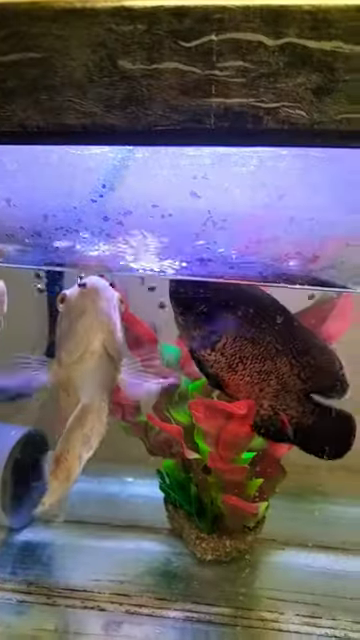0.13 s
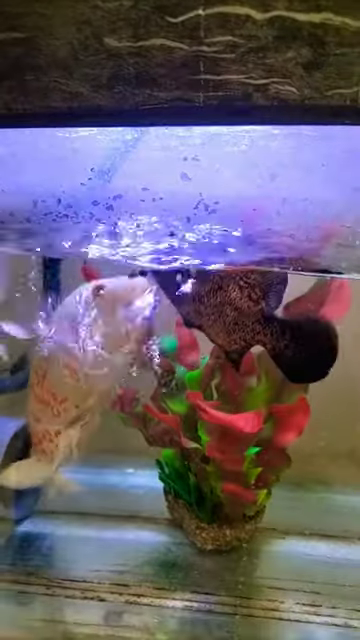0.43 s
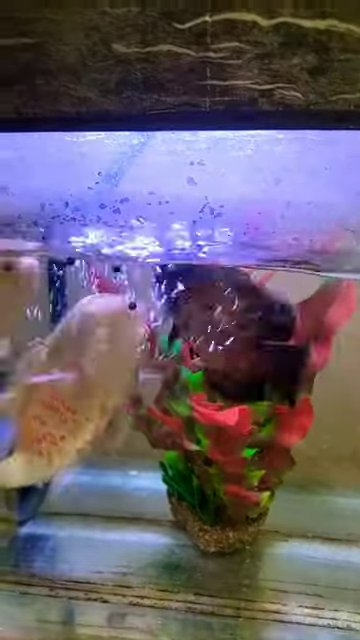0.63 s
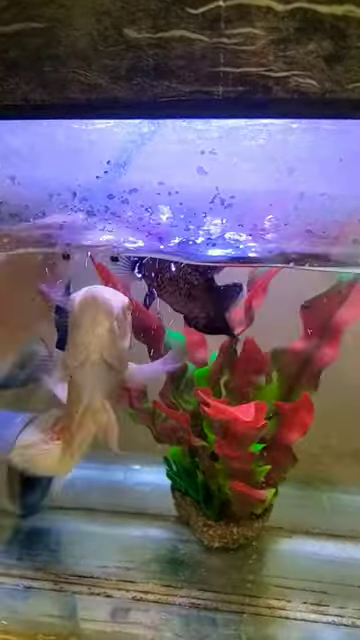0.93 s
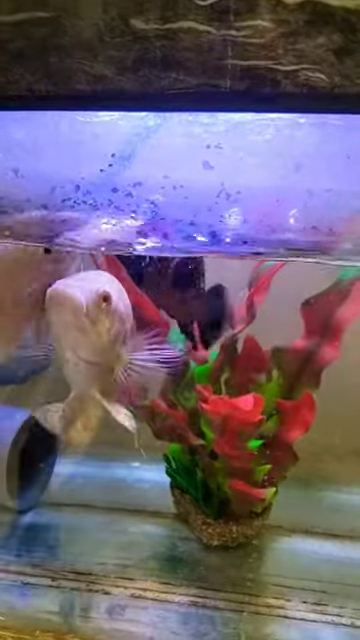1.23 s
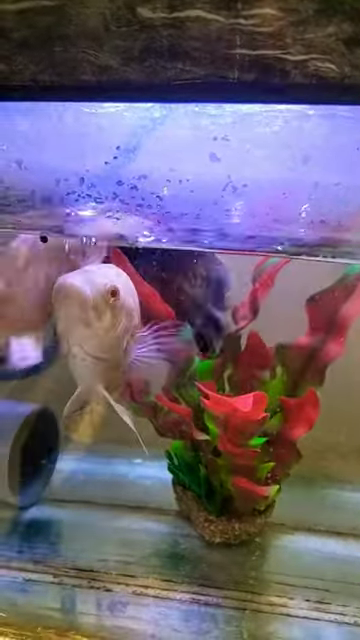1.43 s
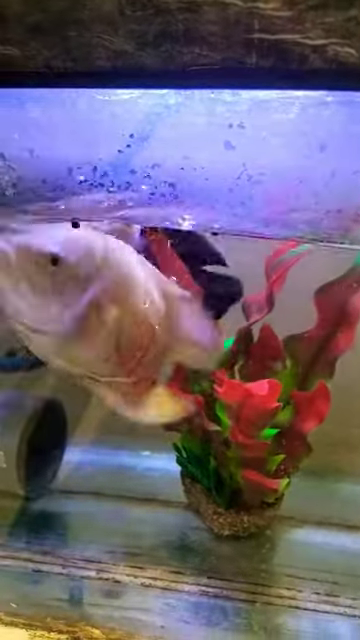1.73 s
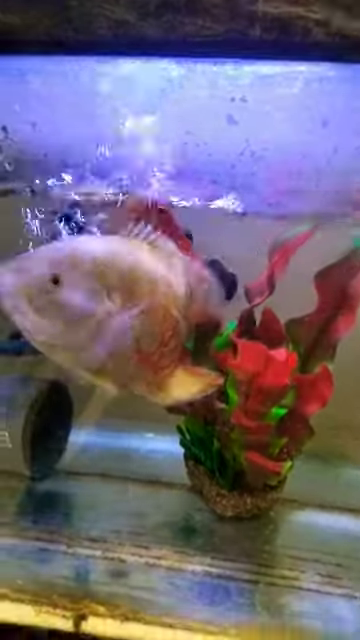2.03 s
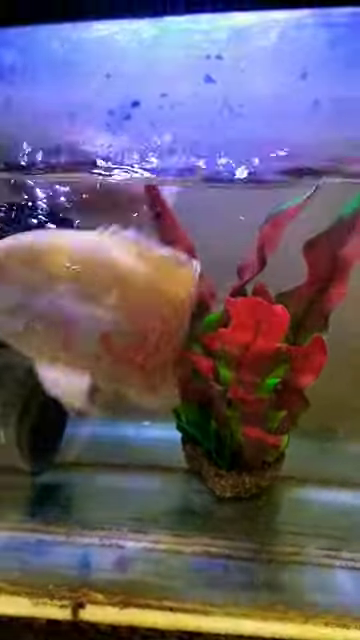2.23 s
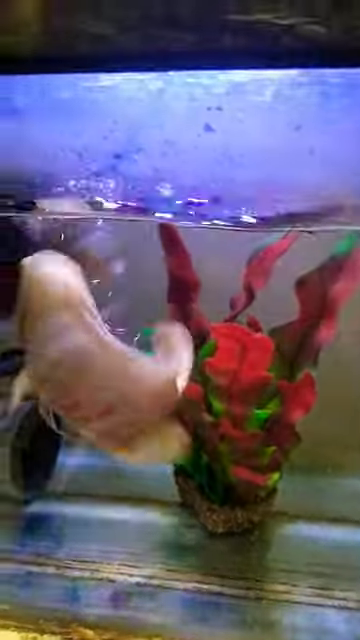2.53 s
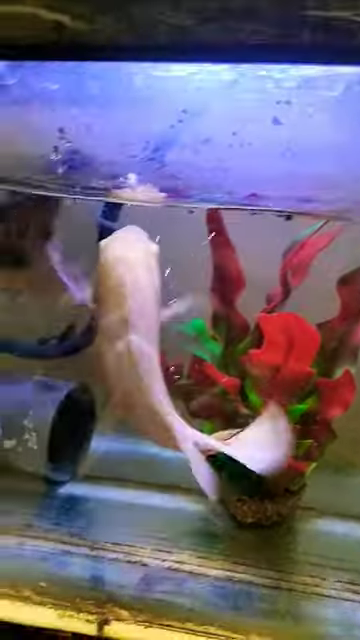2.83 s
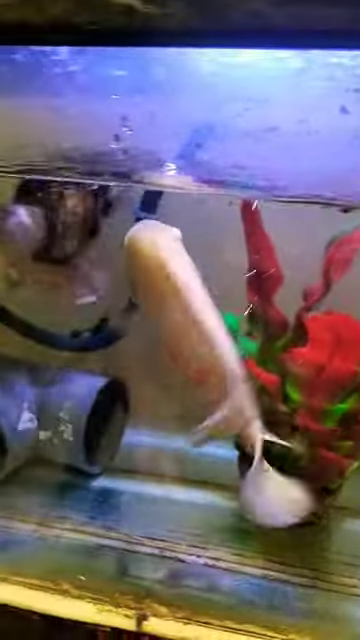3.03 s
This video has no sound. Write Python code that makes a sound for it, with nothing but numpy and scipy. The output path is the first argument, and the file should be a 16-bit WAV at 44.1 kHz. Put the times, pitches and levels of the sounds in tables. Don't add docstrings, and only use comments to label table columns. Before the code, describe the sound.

Fish splash at the surface of an indoor tank. A loud splash is already under way at 0 s, with crackling spray and dense droplets until 0.4, then smaller plops to 0.65. Faint fizz comes near 1.1, a thin spray tick at 1.8, plips and light splashes at 2.0-2.4, and chirpy ringing bubbles with fizz at 2.6-2.95. Filter rush and faint pump hum continue throughout, slightly dull mono.

```python
import sys
import numpy as np
from scipy import signal
from scipy.fft import rfft, irfft
from scipy.io import wavfile
from scipy.ndimage import uniform_filter1d

SR = 44100
rng = np.random.default_rng(int(sys.argv[2]) if len(sys.argv) > 2 else 0)


def invert_db(x):
    u = np.asarray(x, float) / 20
    return 10 ** u


def int16_out(signal):
    q = np.round(np.clip(np.atleast_2d(signal).T, -1, 1) * 32767)
    wavfile.write(sys.argv[1], SR, q.astype(np.int16))


N = 141120


def evened(x):
    return x / np.sqrt(np.mean(abs(x) ** 2) + 1e-30)


def smooth_twice(x, size):
    return uniform_filter1d(uniform_filter1d(x, size), size)


def read(points, hz):
    f, level_db = np.transpose(points)
    return np.interp(np.log(hz + 1), np.log(f + 1), level_db, level_db[0] - 40, level_db[-1] - 40)


def colour(x, points):
    gain = invert_db(read(points, np.fft.rfftfreq(len(x), 1 / SR)))
    return irfft(rfft(x) * gain, len(x))


def resonate(x, hz, width_hz):
    turn = np.exp(2j * np.pi * hz * np.arange(len(x)) / SR)
    pole = np.exp(-np.pi * width_hz / SR)
    low = signal.lfilter([1], np.convolve([1, -pole], [1, -pole]), x / turn)
    return (turn * low).real


def held(length_s, rise_s, fall_s):
    t = np.arange(round((length_s + 8 * fall_s) * SR)) / SR
    return t, np.clip(t / rise_s, 0, 1) * np.exp(-np.maximum(t - length_s, 0) / fall_s)


def add(mix, start_s, sound):
    part = mix[round(start_s * SR):][:len(sound)]
    part += sound[:len(part)]


# hz, level_db
RUSH_LOW = [(28, -45.5), (50, -23), (120, -21.5), (240, -7), (470, -9.5), (1300, -8.5), (1750, -15.5),
            (2600, -32)]
# hz, level_db
RUSH_HIGH = [(900, -25), (1700, -11.5), (2500, -3.5), (3400, -11), (5510, -18), (7100, -35.5), (8810, -57),
             (15510, -62)]
# pitch_hz, width_hz, level_db
HUM = [
    (62.7, 8.9, -78),
    (187, 2.4, -66.5),
    (272.8, 49.4, -58),
    (337.4, 25, -61.5),
    (651.7, 41, -64.5),
    (3920, 740, -66.5),
    (11900, 540, -106),
]
RUSH_LOW_DB, RUSH_HIGH_DB, PATCH_DB = -51, -59.5, 1.28


def pump():
    a, b = rng.standard_normal((2, N))
    rush = invert_db(RUSH_LOW_DB) * evened(colour(a, RUSH_LOW))
    rush += invert_db(RUSH_HIGH_DB) * evened(colour(b, RUSH_HIGH))
    z = signal.stft(rush, nperseg=512)[2]
    patches = uniform_filter1d(rng.standard_normal(z.shape), 8, 0)
    patches = evened(uniform_filter1d(patches, 14, 1))
    out = signal.istft(z * invert_db(PATCH_DB * patches), nperseg=512)[1][:N]
    for hz, width_hz, db in HUM:
        out = out + invert_db(db) * evened(resonate(rng.standard_normal(N), hz, width_hz))
    return out


ROOM_DB, ROOM_T60_S = -12, .22


def room(x):
    t = np.arange(SR // 2) / SR
    tail = rng.standard_normal(len(t)) * invert_db(-60 * t / ROOM_T60_S) * (t > .004)
    return invert_db(ROOM_DB) * signal.fftconvolve(x, tail / np.linalg.norm(tail))[:N]


DROPLETS_PER_S, DROPLET_SPREAD_DB, HISS = 4000, 2, .8


def crackle():
    size = invert_db(DROPLET_SPREAD_DB * np.minimum(rng.exponential(1, N), 4))
    clicks = size * (rng.random(N) < DROPLETS_PER_S / SR)
    return evened(clicks * rng.choice([-1., 1.], N)) + HISS * rng.standard_normal(N)


# start_s, length_s, level_db, pitch_hz, spread_hz
FOAM = [(0.286, 0.024, -45.5, 5100, 2900), (.296, .015, -62, 7540, 710), (.41, .1, -54, 187, 10.4),
        (0.511, 0.046, -67, 6800, 1200), (.535, 0.04, -47, 4880, 1100), (0.582, .05, -56, 4800, 1000),
        (.305, .09, -51, 4140, 450), (.495, .07, -94, 12000, 700), (2.819, .03, -63, 5940, 270),
        (2.826, .06, -62, 3810, 300), (2.07, .02, -86, 11700, 600), (2.18, .035, -88, 11700, 600),
        (2.23, .018, -57, 4020, 500), (2.94, .1, -67, 3110, 400), (0.673, 0.079, -88.5, 8300, 430),
        (.751, .039, -85, 7870, 610), (1.091, 0.11, -51.5, 3510, 1700), (1.234, 0.054, -73.5, 6950, 1000),
        (1.238, 0.04, -89, 10200, 380), (1.256, 0.04, -57, 3480, 570), (2.024, .025, -74, 7640, 1700),
        (2.036, 0.012, -55, 3740, 800), (.53, 0.039, -90, 8840, 560), (2.202, 0.019, -69, 7100, 1400),
        (2.55, .15, -57, 187, 15), (2.601, .059, -84, 11910, 610), (2.605, 0.044, -52, 5820, 1270),
        (2.648, .07, -59, 5950, 1000), (2.699, .48, -94, 11400, 3200), (2.706, 0.04, -65, 6650, 800),
        (2.658, 0.55, -73, 6140, 2200)]
FOAM_FALL_S, FOAM_SAG_DB = .008, -4


def foam(start_s, length_s, db, hz, spread_hz, fizz):
    t, shape = held(length_s, .3 * length_s, FOAM_FALL_S)
    band = np.roll(fizz, -rng.integers(N))[:SR]
    band = resonate(resonate(band, hz, spread_hz), hz, spread_hz)
    return start_s, invert_db(db + FOAM_SAG_DB * t / length_s) * shape * evened(band[-len(t):])


# start_s, length_s, level_db, pitch_hz, rise_hz
BUBBLES = [(.34, .015, -57, 5750, 20), (2.63, .045, -52, 3500, 100), (2.68, .07, -55, 3620, 110),
           (2.672, .045, -51, 3780, 250), (2.71, .025, -61, 4450, 250), (2.72, .052, -46.5, 2200, 200),
           (2.765, .04, -51, 2400, 80), (2.74, .05, -51, 2880, 150), (2.788, .033, -44, 3080, 30),
           (2.825, .025, -55, 3070, 10), (2.862, .068, -50, 3120, 30), (2.675, .04, -58, 1800, 250),
           (2.876, .04, -63, 2280, 70), (2.725, .03, -62, 4220, 80), (2.81, .04, -62, 2300, -150)]
BUBBLE_FALL_S, WAVER, WAVER_S = .006, .55, .003


def bubble(start_s, length_s, db, hz, rise_hz):
    t, shape = held(length_s, .4 * length_s, BUBBLE_FALL_S)
    pitch_hz = hz + rise_hz * np.clip(t / length_s, 0, 1.3)
    size = round(WAVER_S * SR)
    wobble = smooth_twice(rng.standard_normal((2, 8000)), size) * np.sqrt(size)
    wobble = (wobble[0] + 1j * wobble[1])[:len(t)]
    throb = np.sqrt(1 + WAVER ** 2) * evened(1 + WAVER * wobble)
    tone = throb * np.exp(2j * np.pi * np.cumsum(pitch_hz) / SR)
    return start_s, invert_db(db) * shape * tone.real


# peak_s, level_db, pitch_hz, width_s
DROPS = [(0.0012, -46, 2180, 0.0013), (0.003, -39, 3800, 0.0025), (0.0052, -36, 4480, 0.0029),
         (0.007, -39, 2210, 0.0024), (0.0137, -38, 5700, 0.0055), (0.0137, -28, 4400, 0.002),
         (0.017, -46, 2500, 0.0035), (0.018, -41, 3970, 0.0064), (0.0244, -30, 3610, 0.0025),
         (0.0247, -38.5, 2160, 0.0047), (0.0267, -40, 6070, 0.003), (0.0284, -30, 4550, 0.0022),
         (0.0304, -38, 3580, 0.0025), (0.033, -38, 2680, 0.00082), (0.0359, -42, 3700, 0.003),
         (0.0367, -39, 5400, 0.003), (0.0414, -40, 4500, 0.007), (0.044, -45, 3830, 0.0023),
         (0.0536, -41, 4480, 0.0051), (0.0686, -41, 4570, 0.0049), (0.0696, -39, 3500, 0.0064),
         (0.0733, -40, 4610, 0.0042), (0.0756, -38, 3200, 0.0027), (0.0858, -38, 4310, 0.0025),
         (0.0878, -41, 2180, 0.007), (0.091, -39, 3580, 0.0025), (0.0938, -45, 2350, 0.00715),
         (0.1018, -39, 4260, 0.00314), (0.1097, -37, 3920, 0.0046), (0.1192, -37.5, 2174, 0.0079),
         (0.1215, -36, 3520, 0.0081), (0.1259, -35, 4050, 0.0071), (0.1282, -42, 2315, 0.007),
         (0.1337, -39, 4030, 0.007), (0.137, -40, 4730, 0.0043), (0.1395, -42, 4070, 0.007),
         (0.1478, -39, 3030, 0.0072), (0.1805, -41, 4500, 0.0027), (0.1868, -39, 3980, 0.0067),
         (0.211, -46, 4570, 0.007), (0.209, -47, 3790, 0.0032), (0.2113, -41, 2100, 0.0042),
         (0.2165, -37, 3920, 0.005), (0.219, -39, 2130, 0.0042), (0.22, -41, 4560, 0.0081),
         (0.225, -40, 3550, 0.0064), (0.2268, -41, 4500, 0.0022), (0.234, -42, 4350, 0.005)]
# peak_s, level_db, pitch_hz, width_s
PLOPS = [(0.2941, -42, 4470, 0.0062), (0.2998, -43, 5190, 0.0088), (0.3026, -31.5, 3854, 0.0074),
         (0.3195, -39, 4190, 0.007), (0.3365, -41, 4110, 0.007), (0.344, -37.5, 4100, 0.007),
         (0.3594, -40, 4020, 0.007), (0.3664, -46, 4110, 0.007), (0.3727, -48, 4030, 0.007),
         (0.3836, -41, 4000, 0.0043), (0.3891, -47, 3850, 0.0025), (0.3954, -43, 4030, 0.0025),
         (0.4036, -49, 3990, 0.007), (0.4268, -57, 4070, 0.007), (0.528, -47, 4460, 0.007),
         (0.5343, -44, 4440, 0.007), (0.544, -43, 4500, 0.007), (0.5552, -36, 4950, 0.0026),
         (0.563, -39, 4650, 0.0035), (0.5685, -44, 4850, 0.0057), (0.5907, -45, 4840, 0.004),
         (0.6036, -47, 4670, 0.0025), (0.6101, -53, 4930, 0.0065), (0.6161, -57, 4660, 0.0056),
         (0.6228, -51, 4970, 0.004), (0.6288, -54, 4960, 0.007), (2.0389, -42.5, 3510, 0.0087),
         (2.0548, -52, 3270, 0.0032), (2.1177, -35, 2228, 0.0062), (2.1279, -38, 2260, 0.0032),
         (2.1359, -51, 2400, 0.0059)]
# peak_s, level_db, pitch_hz, width_s
STRAYS = [
    (2.7, -62.5, 82, .05),
    (2.58, -60, 66, 0.1),
    (2.043, -44, 3950, 0.0046),
    (2.395, -43.5, 4700, 0.0057),
    (2.617, -62, 7100, .006),
]
DROP_RISE, DROP_DB = .0013, -1


def drop(peak_s, db, hz, width_s):
    time_s = width_s / 2.4
    u = np.arange(round(3.5 * width_s * SR)) / SR / time_s
    turns = hz * u * time_s * (1 + DROP_RISE * (u - 2))
    ring = u * np.exp(1 - u) * np.sin(2 * np.pi * turns)
    return max(peak_s - time_s, 0), invert_db(db + DROP_DB) * ring


GRAINS_PER_S, GRAIN_CYCLES, GRAIN_SPREAD_DB = 90, 11, 2.1


def grains():
    out = np.zeros(N)
    for hz in np.geomspace(1800, 14000, 28):
        u = np.arange(round(4 * GRAIN_CYCLES * SR / hz)) * hz / SR
        ping = np.minimum(u / 2, 1) * np.exp(-u / GRAIN_CYCLES) * np.sin(2 * np.pi * u * (1 + 0.001 * u))
        size = invert_db(GRAIN_SPREAD_DB * np.minimum(rng.exponential(1, N), 4))
        hits = size * (rng.random(N) < GRAINS_PER_S / SR)
        out += signal.oaconvolve(hits, ping * np.sqrt(hz) / np.linalg.norm(ping))[:N]
    return evened(out)


# hz, level_db
BODY = [(700, -32), (1900, -13.5), (2200, -8), (4400, 0), (5800, -11), (7100, -23), (8600, -38.5),
        (15600, -59)]
# hz, level_db
SPRAY = [(5000, -68), (7000, -37.5), (9300, -39), (10300, -34), (12300, -32), (13000, -45), (15300, -45),
         (16000, -71)]
# start_s, body_db, spray_db, t60_s
SLAPS = [(0.0, -32.5, -28, 0.35), (0.02, -36, -48, 0.093), (.059, -49, -51, 0.26),
         (0.087, -41.5, -43, 0.58), (0.115, -33.5, -26.5, 0.065), (0.177, -43.5, -38, 0.12),
         (0.207, -40.5, -39, 0.25), (0.29, -42.5, -40, 0.26), (.321, -50.5, -56, 0.27),
         (0.402, -58.5, -51, 0.14), (.495, -56.5, -69, 0.31), (0.523, -53, -82, 0.53),
         (.915, -63, -61, 0.13), (1.099, -54.5, -73, 0.34), (1.131, -56, -70.5, 0.21),
         (1.782, -53, -38, 0.095), (2.034, -54, -54, 0.15), (2.067, -59, -50, 0.11),
         (2.096, -52, -71, 0.14), (2.128, -64, -38.5, 0.07), (2.177, -52.5, -55, 0.068),
         (2.203, -73, -57, 0.15), (2.232, -59, -60, 0.17), (2.391, -55, -70, 0.27), (2.417, -70, -62, 0.16),
         (2.612, -65, -50, 0.14)]
SLAP_RISE_S, GRAIN_SHARE = .004, .5


def slaps():
    t = np.arange(N) / SR
    drops = crackle() + GRAIN_SHARE * grains()
    unit = np.std(colour(drops, BODY))
    body_power, spray_power = np.zeros((2, N))
    for start_s, body_db, spray_db, t60_s in SLAPS:
        rise = np.clip((t - start_s) / SLAP_RISE_S + (start_s == 0), 0, 1)
        shape = rise * invert_db(-60 * np.maximum(t - start_s, 0) / t60_s)
        body_power += (invert_db(body_db) * shape) ** 2
        spray_power += (invert_db(spray_db) * shape) ** 2
    body = colour(np.sqrt(body_power) * drops, BODY)
    spray = colour(np.sqrt(spray_power) * drops, SPRAY)
    return (body + spray) / unit


def scene():
    rush, water, fizz = pump(), slaps(), crackle()
    for row in BUBBLES:
        add(water, *bubble(*row))
    for row in DROPS + PLOPS + STRAYS:
        add(water, *drop(*row))
    for row in FOAM:
        add(water, *foam(*row, fizz=fizz))
    return (water + room(water) + rush)[None]


def top_cut(x):
    return signal.sosfilt(signal.butter(12, 15500, fs=SR, output="sos"), x)


def record(dry):
    return top_cut(dry)


dry = scene()
out = record(dry)
int16_out(out)
```